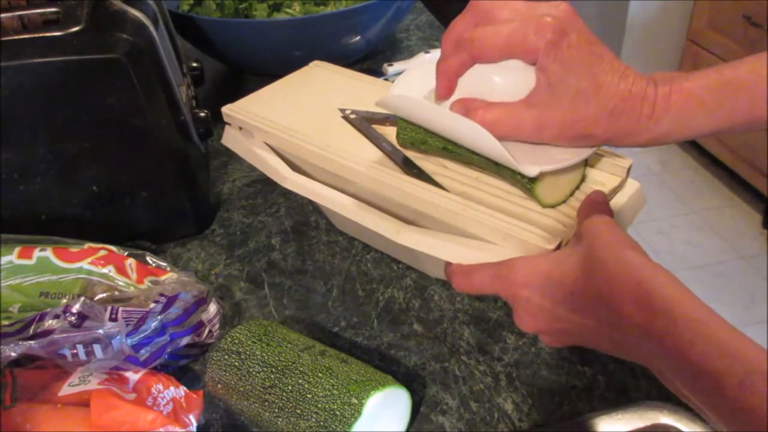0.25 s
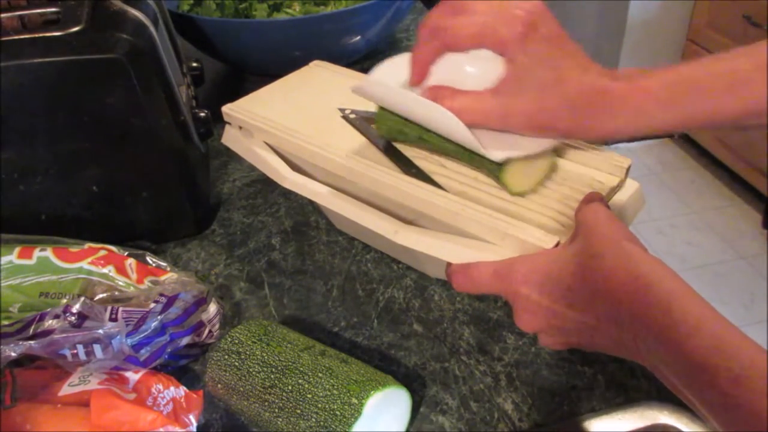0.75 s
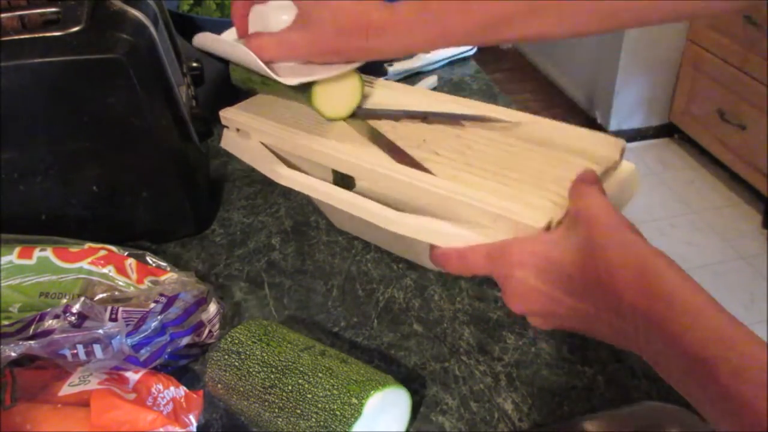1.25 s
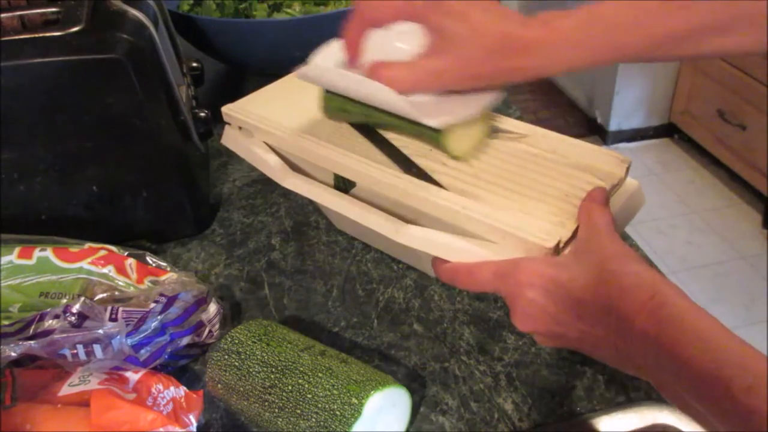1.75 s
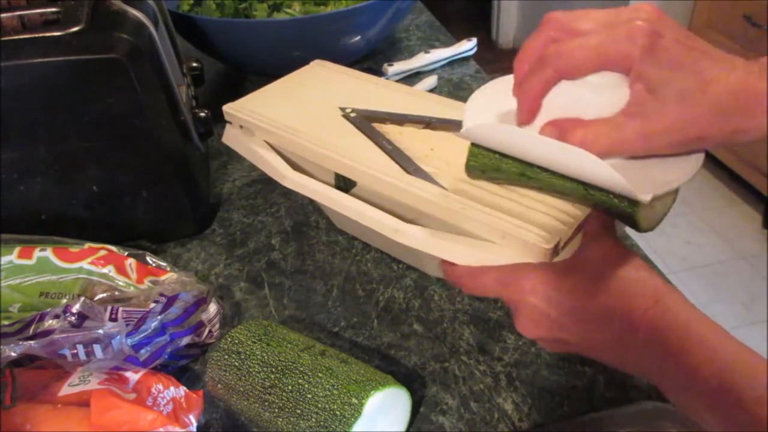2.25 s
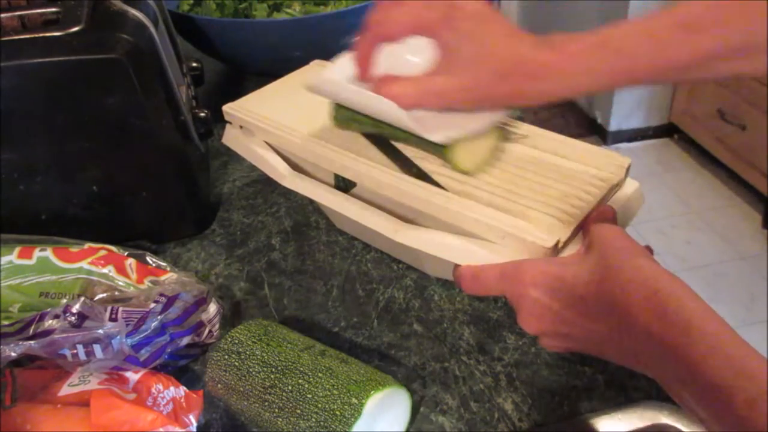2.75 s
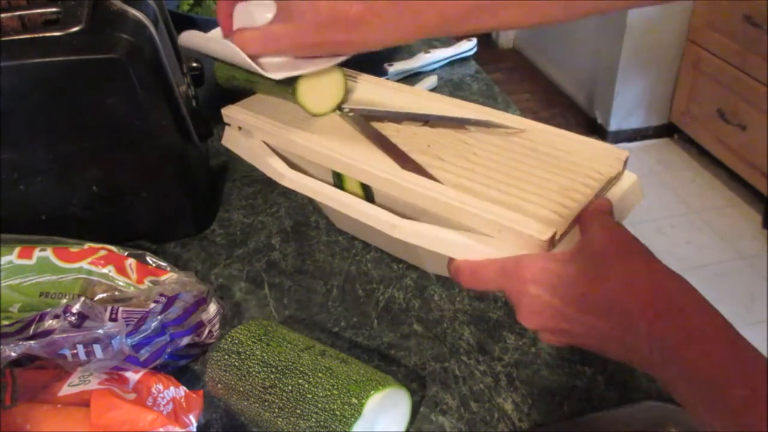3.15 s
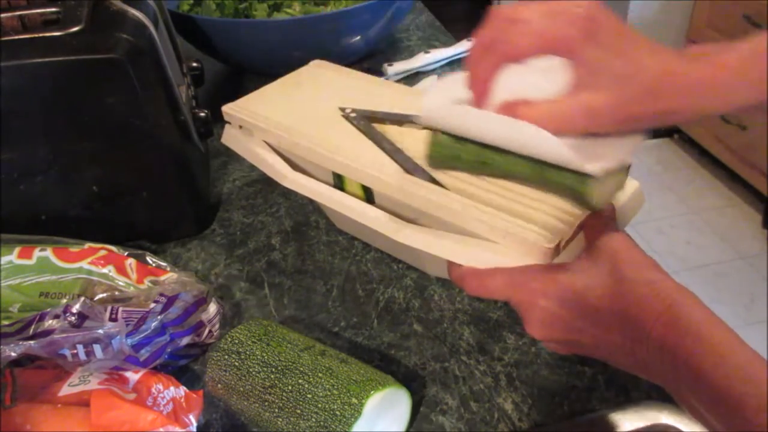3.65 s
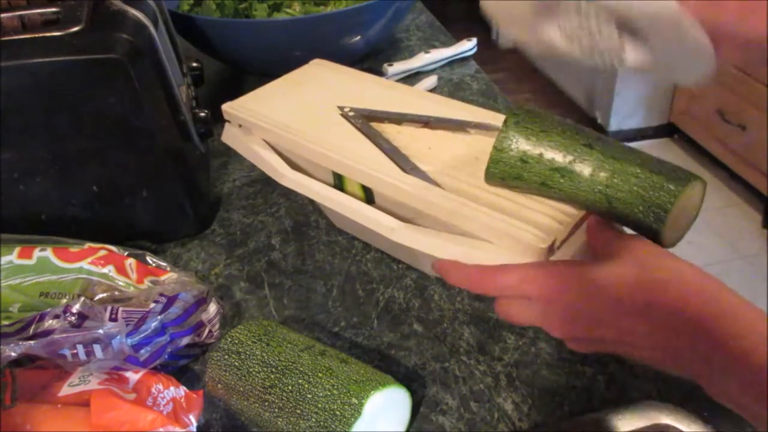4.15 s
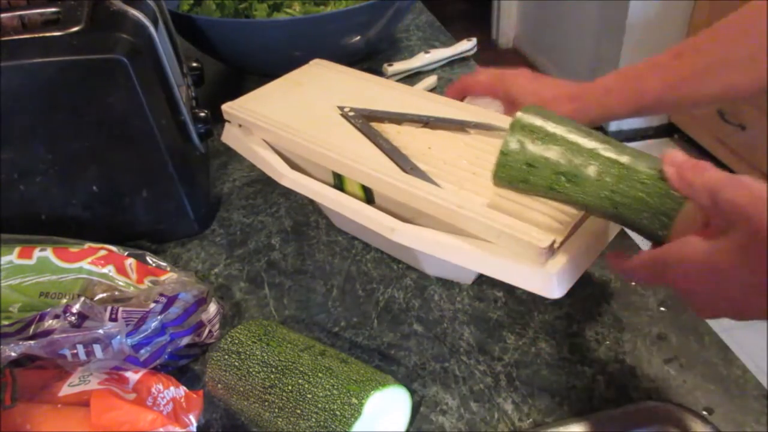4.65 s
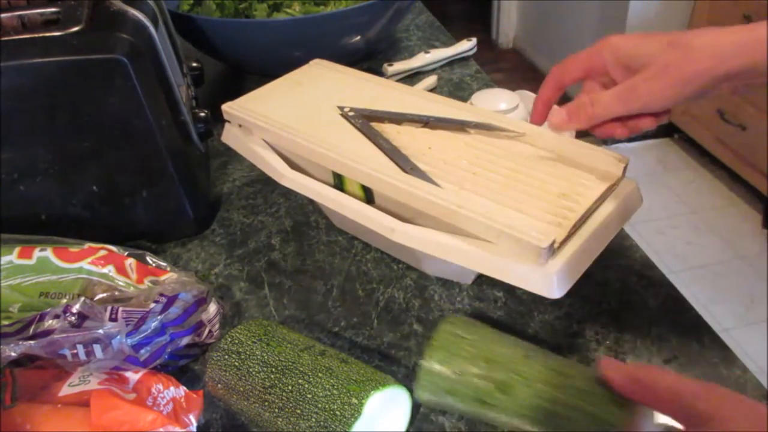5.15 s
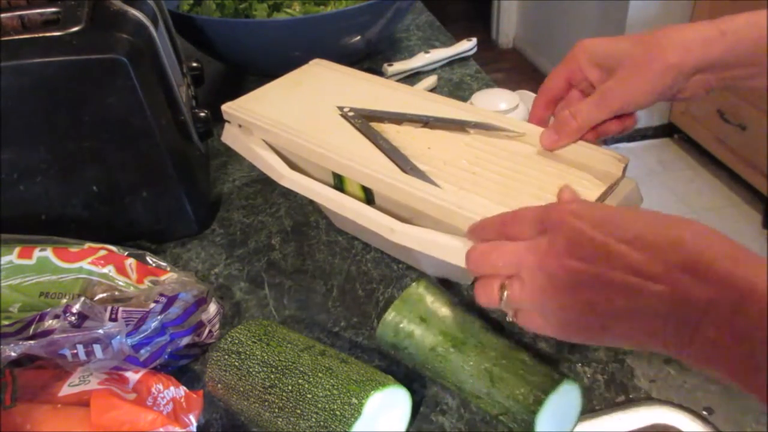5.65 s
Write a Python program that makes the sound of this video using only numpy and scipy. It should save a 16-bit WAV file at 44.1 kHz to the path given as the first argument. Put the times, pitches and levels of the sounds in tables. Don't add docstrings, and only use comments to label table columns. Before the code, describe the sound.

A zucchini is pushed over a ribbed hollow slicer in two wet, ticking swishes ending in knocks, then the holder clatters down hard.

```python
import sys
import numpy as np
from scipy import signal
from scipy.fft import rfft, irfft, next_fast_len
from scipy.io import wavfile

SR = 44100
rng = np.random.default_rng(int(sys.argv[2]) if len(sys.argv) > 2 else 0)


def waveform_to_disk(signal):
    frames = np.transpose(np.atleast_2d(signal))
    scaled = np.clip(frames, -1, 1) * 32767
    samples = np.round(scaled).astype(np.int16)
    wavfile.write(sys.argv[1], SR, samples)


def voltage_ratio(decibels):
    exponent = np.asarray(decibels, float) / 20
    return 10 ** exponent


N = 260586


def rms_one(x):
    return x / np.sqrt(np.mean(x ** 2) + 1e-20)


def add_at(out, s, sound):
    at = round(s * SR)
    out[at:at + len(sound)] += sound


def drift(rate_hz):
    hop = 40
    r = np.exp(-2 * np.pi * rate_hz * hop / SR)
    slow = signal.lfilter([1], [1, -2 * r, r * r], rng.standard_normal(N // hop + 2002))[2000:]
    return np.interp(np.arange(N) / hop, np.arange(len(slow)), rms_one(slow))


def ring(force, modes, spread_db=0):
    out = 0
    spread_db = spread_db + np.zeros(10)
    for k, (hz, level_db, t60_s) in enumerate(modes):
        r, w = voltage_ratio(-60 / (t60_s * SR)), 2 * np.pi * hz / SR
        gain = voltage_ratio(level_db + spread_db[k]) * (-1) ** k
        out = out + gain * signal.lfilter([0, np.sin(w)], [1, -2 * r * np.cos(w), r * r], force + 1e-18)
    return out


def resonant_noise(white, hz, width_hz):
    return rms_one(ring(white, [(hz, 0, np.log(1000) / (np.pi * width_hz))]))


def note(t, peak_db, hz, t60_s):
    return voltage_ratio(peak_db - 60 * t / t60_s) * (1 - np.exp(-t * hz)) * np.sin(2 * np.pi * hz * t)


def coloured(x, spectrum):
    size = next_fast_len(N)
    hz, level_db = np.transpose(spectrum)
    bins_hz = np.maximum(np.arange(size // 2 + 1) * SR / size, 1)
    gain = voltage_ratio(np.interp(np.log(bins_hz), np.log(hz), level_db))
    return rms_one(irfft(rfft(x, size) * gain, size)[:N])


def slips(per_s, size_db):
    sizes = voltage_ratio(size_db * np.minimum(rng.exponential(1, N), 5)) * rng.choice([-1, 1], N)
    return sizes * (rng.random(N) < per_s / SR)


GRID = 64


def swell(s, db, rise_s, fall_s):
    t = np.arange(0, N, GRID) / SR - s
    return voltage_ratio(db - 20 * np.maximum(-t / max(rise_s, .01), t / max(fall_s, .01)))


def spread_out(powers):
    return np.interp(np.arange(N), np.arange(0, N, GRID), np.sqrt(powers))


# [f/Hz, level/dB, t60/s]
COUNTER_MODES = [(65.5, -16, 0.066), (84.6, -13.5, 0.073), (101.7, 0.5, 0.074), (146.5, -2.5, 0.041),
                 (206.4, -2, 0.046), (281.3, -9.5, 0.099)]
BODY_MODES = [(404, -7, 0.06), (478.7, -11, 0.088), (591, -5, 0.046), (640, -3, 0.043), (678, 2, 0.033),
              (805, -7.5, 0.052), (937, -4, 0.016), (1119, -12.5, 0.04), (1334, -13.5, 0.036)]
DECK_MODES = [(1530, 6, 0.0078), (1564, 2, 0.021), (1883, 4.5, 0.019), (2323, -2.5, 0.03), (2653, 1, 0.01),
              (3018, 0.5, 0.017), (3500, 0.5, 0.017), (3520, -8, 0.03), (4760, -22, 0.0027),
              (5370, -6.5, 0.0025)]
# [f/Hz, level/dB per Hz]
SKIN_SPECTRUM = [(760, -12), (1300, -11), (2200, 1.5), (2380, -7.5), (2840, -4.5), (2960, -8.5),
                 (3770, -6.5), (4690, -1.5), (7000, -14), (9100, -39), (15400, -120)]
SKIN_TREBLE = [(3530, -7), (6000, -12.5), (7520, -6.5), (12900, -12), (14400, -14), (15500, -7.5)]
# [fastest t/s, hiss
# level/dB, rise/s, fall/s, body shake/dB re hiss]
PUSHES = [
    (.85, -58, 0.16, 0.21, 9),
    (1.0, -47, 0.23, 0.16, 1.5),
    (1.15, -48.5, 0.14, 0.16, 2.5),
    (1.35, -65.5, .08, .2, 5),
    (2.56, -60.5, 0.22, .3, 5.5),
    (2.74, -55, 0.13, 0.27, 0),
    (2.875, -43, 0.13, 0.32, -2),
    (3.1, -56.5, 0.24, 0.083, 4),
    (3.15, -57.5, 0.091, .04, 6.5),
    (3.36, -50, .07, .3, 7),
]
RETURNS = [(.3, -64.5, 0.23, .2, 3), (.43, -65, .1, 0.13, 1), (.7, -69, .3, .2, 2),
           (1.62, -59, 0.18, .1, 2), (1.68, -54, 0.1, .08, 4), (1.74, -54, .04, 0.15, 2),
           (1.89, -49, .08, 0.06, 5), (1.95, -57.5, .15, 0.17, 2.5), (2.08, -61.5, 0.12, 0.45, 5),
           (3.53, -52.5, 0.43, 0.25, -11), (3.635, -52, 0.11, .13, 2.5), (3.8, -66.5, .3, .4, 11.5),
           (3.98, -65.5, .15, 0.33, 12)]
BRUSHES = [
    (4.41, -52, 0.14, 0.19, -9),
    (4.88, -59.5, .1, 0.13, 4.5),
    (5.45, -65.5, 0.28, 0.26, 8.5),
    (5.7, -59, 0.27, 0.11, 2.5),
    (5.76, -56, 0.085, 0.074, 12),
    (5.89, -61.5, 0.054, 0.088, 12),
]
# [t/s, rumble level/dB, rise/s, fall/s]
SHIFTS = [(.42, -58, .15, .15), (1.15, -45, 0.058, 0.2), (1.6, -48, .05, .05), (1.915, -46, .05, .09),
          (2.03, -50, .05, 0.13), (2.28, -56, .04, .03), (2.72, -50, .15, .15), (3.05, -42, 0.13, 0.054),
          (3.48, -47, .1, .1), (3.37, -43, .06, .05), (3.64, -43, .1, .06), (3.73, -50, .08, .05),
          (4.27, -49, .08, .12), (4.4, -54, .07, .04), (5.33, -45, .09, .4), (5.53, -53, .2, .2),
          (5.7, -44, .2, .1), (5.86, -49, .08, .15)]
PUSH_TREBLE_DB, RETURN_TREBLE_DB, BRUSH_TREBLE_DB = -2.5, -4.5, -10.5
RUMBLE_RE_SHAKE_DB = -2.5
RUMBLE_TILT_DB = -2.5


def sliding():
    kinds = ((PUSHES, PUSH_TREBLE_DB), (RETURNS, RETURN_TREBLE_DB), (BRUSHES, BRUSH_TREBLE_DB))
    moves = []
    for rows, treble_db in kinds:
        for s, db, rise_s, fall_s, shake_db in rows:
            moves.append((swell(s, db, rise_s, fall_s) ** 2, voltage_ratio(treble_db) ** 2, voltage_ratio(shake_db) ** 2))
    speed = spread_out(sum(power for power, treble, shake in moves))
    bright = spread_out(sum(power * treble for power, treble, shake in moves))
    shaking = sum(power * shake for power, treble, shake in moves)
    shifts = sum(swell(*row) ** 2 for row in SHIFTS)
    shifting = spread_out(voltage_ratio(RUMBLE_RE_SHAKE_DB) ** 2 * shaking + shifts)

    jerks = slips(per_s=6000, size_db=2.2) * voltage_ratio(1.8 * drift(45))
    hiss = rms_one(coloured(jerks, SKIN_SPECTRUM) + .3 * rms_one(ring(jerks, DECK_MODES)))
    treble = coloured(jerks, SKIN_TREBLE)
    body_jerks = slips(per_s=1500, size_db=1.5) * voltage_ratio(1.8 * drift(30))
    body = rms_one(ring(body_jerks, BODY_MODES))
    tilt_db = RUMBLE_TILT_DB * np.arange(10)
    rumble = rms_one(ring(slips(per_s=300, size_db=5.5), COUNTER_MODES, tilt_db))

    skin = voltage_ratio(-5.5) * speed * hiss + voltage_ratio(4.5) * bright * treble
    return skin + voltage_ratio(-3.5) * spread_out(shaking) * body + voltage_ratio(-4.5) * shifting * rumble


# [t/s, peak level/dB, f/Hz]
TICKS = [(0.9692, -33, 5010), (0.9774, -33, 5260), (0.9874, -36, 5250), (1.0034, -36, 4810),
         (1.0124, -36, 4800), (1.0254, -35, 4800), (1.0316, -32, 4310), (1.0364, -31, 4700),
         (1.0454, -38, 4750), (1.1474, -37, 2310),
         (1.6168, -45, 2060), (1.6717, -40, 2300), (1.757, -26, 7620), (1.7824, -32, 3080),
              (1.8857, -36, 3870), (2.0014, -36, 2020),
         (2.8024, -35, 4520), (2.8434, -27, 2360), (2.8484, -25, 2320), (2.8554, -25, 2330),
                (2.8634, -29, 2360), (2.8754, -29, 2510), (2.8838, -27, 6480), (2.8964, -27, 7340),
                (2.9024, -28, 7850), (2.9094, -30, 7320), (2.9244, -30, 6420), (2.9384, -32, 4680),
                (2.9696, -32, 2330), (3.0205, -34, 4310),
         (3.454, -37, 4150), (3.461, -36, 4240), (3.5623, -40, 2010), (3.6267, -36, 4550)]
# [t/s, peak level/dB, f/Hz]
NUDGES = [(0.822, -43, 786), (0.839, -39, 681), (0.873, -42, 592), (0.918, -40, 729),
          (0.966, -37, 794), (1.001, -41, 743), (1.022, -41, 786), (1.095, -37, 498),
          (2.802, -41, 1060), (2.843, -38, 694), (2.883, -36, 493), (2.96, -34, 668),
                 (2.971, -31, 433), (2.997, -39, 692), (3.049, -39, 511),
          (3.35, -35, 493), (3.37, -34, 587), (3.582, -47, 401), (3.606, -44, 694), (3.627, -42, 600),
          (4.755, -22, 509), (4.764, -25, 627), (4.776, -26, 506), (4.784, -30, 616),
                 (4.796, -35, 751), (4.807, -34, 622), (4.817, -33, 627)]
TICK_S, TICK_TRIM_DB, TICK_NOTE_SHARE = .0018, -4, .6
NUDGE_T60_S, NUDGE_TRIM_DB = .035, -3


def chatter():
    out, t = np.zeros(N + SR), np.arange(2000) / SR
    ticks = TICKS
    highs = signal.butter(2, 1800, "high", fs=SR, output="sos")
    for s, db, hz in ticks:
        force = rng.standard_normal(len(t)) * np.exp(-t / TICK_S)
        burst = signal.sosfilt(highs, force)
        tone = ring(force, [(hz, 0, 12.0 / hz)])
        tick = burst / np.abs(burst).max() + TICK_NOTE_SHARE * tone / np.abs(tone).max()
        add_at(out, s, voltage_ratio(db + TICK_TRIM_DB) * tick)
    for s, db, hz in NUDGES:
        add_at(out, s, note(t, db + NUDGE_TRIM_DB, hz, NUDGE_T60_S))
    return out[:N]


# [t/s, peak level/dB, f/Hz, width/Hz, swell/s]
SCUFFS = [(1.026, -41, 4630, 650, 0.0097), (1.138, -45.5, 2320, 440, 0.013), (.95, -52.5, 4700, 580, 0.028),
          (4.76, -45, 2400, 6800, 0.017), (1.661, -55, 4500, 1300, 0.0057),
          (1.869, -56, 3900, 5000, 0.0084), (2.844, -41.5, 2420, 200, 0.0067),
          (2.843, -43, 7800, 6800, 0.011), (2.88, -43, 7200, 2200, 0.015), (2.695, -55.5, 980, 180, 0.024),
          (4.128, -21.5, 1840, 3100, 0.0036), (4.735, -32, 6200, 6450, 0.0073),
          (3.378, -50.5, 2900, 600, 0.0077), (3.452, -46.5, 4300, 460, 0.0047),
          (3.49, -55, 4800, 500, 0.026), (3.741, -46, 2930, 1000, 0.0032),
          (3.983, -42.5, 1460, 540, 0.0031), (4.1, -40, 660, 290, 0.013), (4.707, -36, 1500, 4000, .008),
          (4.708, -35, 560, 400, .01), (4.745, -31, 520, 500, .018), (1.517, -36, 3150, 920, 0.0027),
          (4.093, -29.5, 3500, 2200, 0.0084), (4.094, -40, 7500, 5300, 0.0053),
          (5.435, -56.5, 3600, 3700, 0.0078), (5.74, -52.5, 2500, 3100, 0.0075)]


def scuffs():
    out, t = np.zeros(N + SR), np.arange(SR // 4) / SR
    for s, db, hz, width_hz, swell_s in SCUFFS:
        rough = resonant_noise(rng.standard_normal(len(t)), hz, width_hz)
        add_at(out, s, voltage_ratio(db) * rough * (t / swell_s) * np.exp(1 - t / swell_s))
    return out[:N]


# [t/s, body peak/dB, thud/dB, deck click/dB, contact/s]
SLAMS = [
    (1.5035, -29, -40, -38, .003),
    (1.517, -31, -38, -40, .005),
    (3.291, -25, -36, -32, 0.002),
    (3.3005, -33, -40, -33, 0.004),
    (4.0885, -22, -12, -41, .0043),
    (4.128, -28, -44, -18.5, 0.002),
    (4.731, -15, -30, -16.5, 0.0025),
    (4.741, -16, -30, -16.5, 0.003),
]
# [t/s, body peak/dB, deck click/dB]
TAPS = [(.962, -44, -52), (1.119, -40, -52), (1.133, -37.5, -45), (1.219, -45, -54), (1.266, -44, -47.5),
        (1.96, -40.5, -44.5), (2.001, -39.5, -37.5), (2.079, -49, -64), (2.842, -45, -52),
        (3.201, -47.5, -67), (3.629, -45.5, -39), (3.74, -59, -53), (3.986, -39.5, -65), (4.156, -37, -37),
        (4.19, -39, -49), (4.633, -43.5, -52), (4.816, -55, -47), (4.838, -43, -50), (5.75, -47, -54),
        (5.868, -41, -45)]
# [t/s, snap/dB, body peak/dB, deck click/dB, contact/s]
CRACKS = [
    (.978, -41, -45, -58, .0025),
    (1.756, -31.5, -46, -50, .0057),
    (1.783, -38, -56, -42, .003),
    (2.883, -34, -38.5, -51, .004),
    (2.972, -40.5, -38, -47, .002),
    (3.048, -49, -39, -62, .0059),
    (3.384, -44, -38, -60, .0054),
    (4.626, -55, -47, -34.5, .005),
    (4.705, -27, -28, -17, .003),
    (5.444, -49.5, -50, -57, .0036),
]
# [t/s, thud/dB, deck click/dB]
BUMPS = [
    (.847, -42.5, -65),
    (2.009, -40, -43.5),
    (5.27, -46, -63),
    (5.322, -49, -56),
    (5.479, -43, -71),
    (5.793, -42, -52),
]
SLAM_SNAP_DB = -14.5
TAP_THUD_DB, DULL_THUD_SHARE, TAP_SNAP_DB, TAP_CONTACT_S = -19, .3, -14, 0.0038
CRACK_THUD_DB = -14
BUMP_BODY_DB, BUMP_SNAP_DB, BUMP_CONTACT_S = -12, -6, 0.003


def contacts():
    hits = []
    for s, body, thud, deck, contact_s in SLAMS:
        hits.append((s, body, thud, deck, deck + SLAM_SNAP_DB, contact_s))
    for s, body, deck in TAPS:
        thud = body + TAP_THUD_DB + DULL_THUD_SHARE * (body - deck)
        hits.append((s, body, thud, deck, deck + TAP_SNAP_DB, TAP_CONTACT_S))
    for s, snap, body, deck, contact_s in CRACKS:
        hits.append((s, body, body + CRACK_THUD_DB, deck, snap, contact_s))
    for s, thud, deck in BUMPS:
        hits.append((s, thud + BUMP_BODY_DB, thud, deck, deck + BUMP_SNAP_DB, BUMP_CONTACT_S))
    return sorted(hits)


# [f/Hz, level/dB, t60/s]
SNAP_MODES = [(7500, -3.5, 0.013), (9720, -14, 0.00074)]
# [t/s, peak level/dB, f/Hz, t60/s]
LANDINGS = [(1.1195, -27, 423, 0.028), (1.510, -21, 240, 0.06), (2.968, -29.5, 420, 0.056),
            (3.292, -21, 457, 0.045), (3.292, -21, 710, .06), (3.2945, -12.5, 102, .085),
            (3.304, -28, 231, .08), (3.293, -31, 970, .05), (3.305, -28, 500, .08), (1.505, -38, 2600, .02),
            (4.105, -22, 690, .08), (4.708, -27, 120, .12), (4.775, -32, 135, .07), (4.14, -28, 108, .12),
            (4.0935, -2, 170, .035), (4.130, -3, 670, 0.021), (4.129, -21, 1900, .03),
            (4.112, -24, 280, .14), (4.152, -30, 760, .04), (4.7405, -9, 680, 0.03), (5.278, -37, 92, 0.11),
            (5.37, -42, 80, .1), (5.504, -39, 111, 0.099), (5.83, -44, 90, .06), (4.706, -15, 1266, 0.018),
            (4.73, -24, 281.7, 0.14), (4.838, -33, 547, 0.043), (3.2015, -37, 583, 0.033),
            (1.505, -22, 690, 0.08), (1.5035, -21, 500, .06), (1.505, -17, 105, .07),
            (1.508, -33, 1000, .04), (4.731, -13, 625, 0.055), (4.634, -38, 700, .05),
            (5.444, -48, 100, .07)]
HOLDER_FREE_S, HOLDER_LOWS_DB = 4.1, -9


def knocks():
    out, t = np.zeros(N + SR), np.arange(SR // 4) / SR
    push = (t / .0011) ** 2 * np.exp(-t / 0.00077)
    mids = signal.butter(3, [1100, 5800], "band", fs=SR, output="sos")
    highs = signal.butter(2, [5500, 14000], "band", fs=SR, output="sos")
    lowest = np.arange(10) < 2
    for s, body_db, thud_db, deck_db, snap_db, contact_s in contacts():
        spread = rng.normal(0, 2.46, 10)
        force = np.zeros(len(t))
        force[:1500] = rng.standard_normal(1500) * np.exp(-t[:1500] / np.clip(contact_s, 3e-4, .012))
        body = ring(force, BODY_MODES, spread + HOLDER_LOWS_DB * (s > HOLDER_FREE_S) * lowest)
        thud = ring(push, COUNTER_MODES, spread)
        deck = ring(force, DECK_MODES, spread) + 24 * signal.sosfilt(mids, force)
        snap = ring(force, SNAP_MODES, spread) + 12 * signal.sosfilt(highs, force)
        parts = ((body, body_db), (thud, thud_db + 3.5), (deck, deck_db + 2.5), (snap, snap_db + 5.5))
        for sound, db in parts:
            add_at(out, s, voltage_ratio(db) * sound / np.abs(sound).max())
    for s, db, hz, t60_s in LANDINGS:
        add_at(out, s, note(t, db, hz, t60_s))
    return out[:N]


# [low f/Hz, high f/Hz, t60/s, level/dB]
KITCHEN_BANDS = [(59.3, 710, 0.29, -11.5), (413, 960, 0.22, -12), (1380, 3170, 0.19, -8),
                 (4000, 9200, 0.23, -13.5), (9000, 17000, 0.088, -11.5)]


def kitchen(x):
    t = np.arange(SR // 2) / SR
    echo = 0
    for low_hz, high_hz, t60_s, db in KITCHEN_BANDS:
        band = signal.butter(2, [low_hz, high_hz], "band", fs=SR, output="sos")
        tail = voltage_ratio(-60 * t / t60_s) * (1 - np.exp(-t / 0.0035))
        noise = signal.sosfilt(band, rng.standard_normal(len(t)))
        echo = echo + voltage_ratio(db) * noise * tail / np.sqrt(np.sum(tail ** 2))
    return signal.fftconvolve(x, echo)[:N]


# [f/Hz, level/dB per Hz]
AIR_SPECTRUM = [(13, -48), (22, 8.5), (114, -4.5), (220, -10), (253, 0.5), (275, -25), (371, -3),
                (414, -26), (462, -12), (918, -15), (1110, -13), (6990, -28.5), (15500, -38.5)]
# [f/Hz, width/Hz, level/dB]
FRIDGE_HUM = [(123, 51, -74.5), (252, 68, -72.5), (359, 7.5, -66.5), (387, 22, -67.5), (433.4, 14, -70.5),
              (904, 78, -68.5)]
AIR_DB = -55.5


def room_tone():
    white = rng.standard_normal(N)
    hum = sum(voltage_ratio(db) * resonant_noise(white, hz, width_hz) for hz, width_hz, db in FRIDGE_HUM)
    return voltage_ratio(AIR_DB) * coloured(rng.standard_normal(N), AIR_SPECTRUM) + hum


def scene():
    blows = knocks() + scuffs()
    return (sliding() + chatter() + blows + kitchen(blows) + room_tone())[None]


# [t/s, f/Hz above which most bands drop out, share of bands lost]
DROPOUTS = [(.432, 5000, .85), (.75, 3500, .9), (.768, 2000, .9), (1.137, 3000, .93), (1.222, 5000, .95),
            (1.327, 5000, .9), (1.857, 8000, .98), (1.968, 3000, .88), (2.63, 2500, .9), (3.035, 1000, .88),
            (3.143, 1500, .88), (3.565, 1500, .88), (4.062, 4000, .92), (4.21, 5500, 1), (4.46, 3500, .88),
            (4.915, 5500, .98), (5.47, 2500, .88), (5.555, 2000, .9), (5.79, 2500, .88)]
SURVIVOR_GAIN = 2.5


def dropouts(x):
    out, size = x.copy(), 1400
    bins_hz = np.arange(size + 1) * SR / (2 * size)
    band = (bins_hz // 100).astype(int)
    fade = np.pad(signal.windows.tukey(size, 1), size // 2)
    for s, hz, share in DROPOUTS:
        at = round(s * SR) - size
        loss = share * np.clip(.6 + .2 * bins_hz / hz, 0, 1)
        gain = SURVIVOR_GAIN * (rng.random(230)[band] > loss)
        change = rfft(x[:, at:at + 2 * size]) * (bins_hz > hz) * (gain - 1)
        out[:, at:at + 2 * size] += fade * irfft(change)
    return out


def low_pass(x):
    return signal.sosfilt(signal.butter(12, 16070, fs=SR, output="sos"), x)


MIC_LOW_HZ, TOP_HZ = 76, 15300


def record(dry):
    heard = signal.sosfilt(signal.butter(2, MIC_LOW_HZ, "high", fs=SR, output="sos"), dry)
    heard = signal.sosfilt(signal.cheby2(20, 50, TOP_HZ, fs=SR, output="sos"), heard)
    mix = dropouts(heard)
    return low_pass(mix)


dry = scene()
out = record(dry)
waveform_to_disk(out)
```